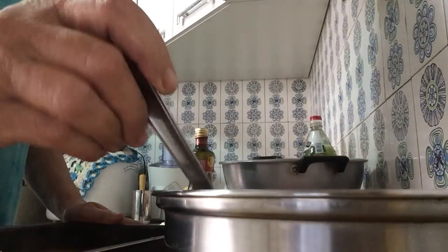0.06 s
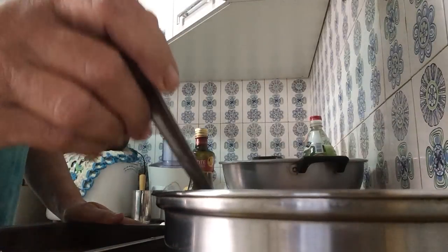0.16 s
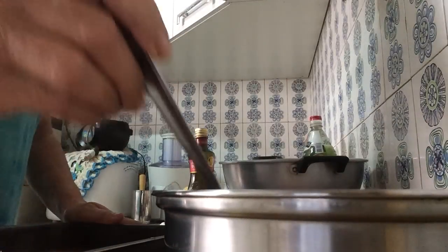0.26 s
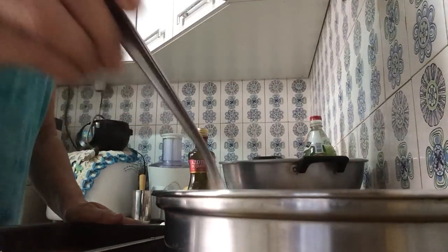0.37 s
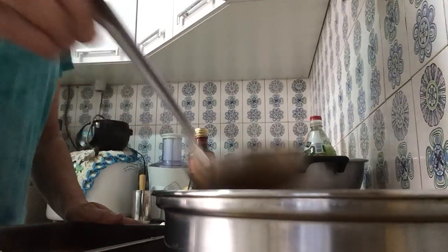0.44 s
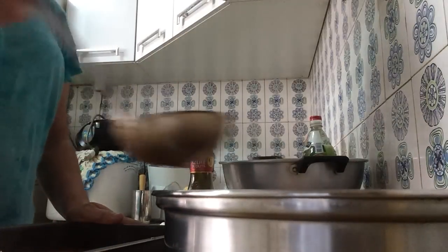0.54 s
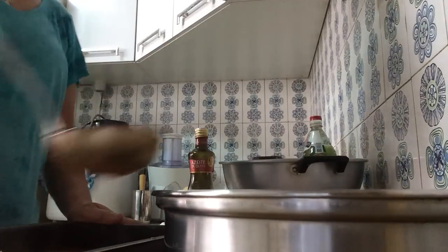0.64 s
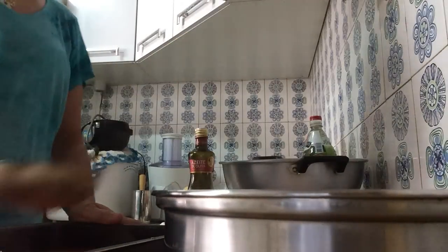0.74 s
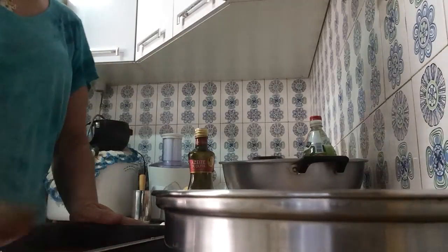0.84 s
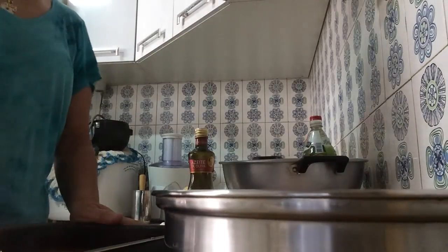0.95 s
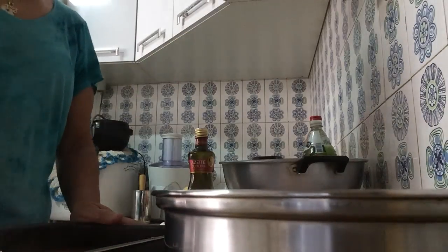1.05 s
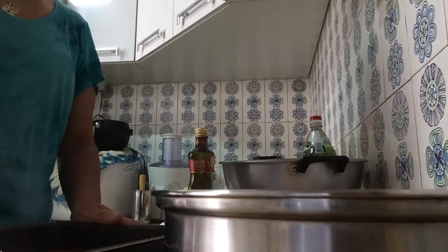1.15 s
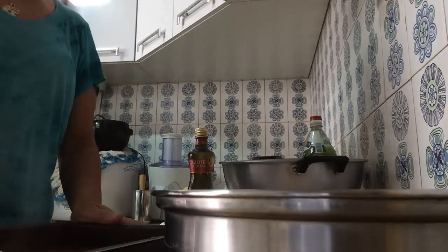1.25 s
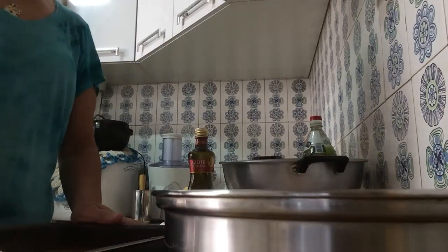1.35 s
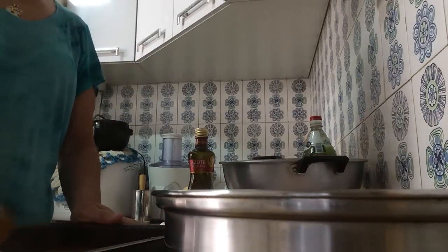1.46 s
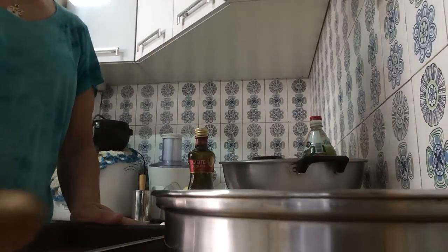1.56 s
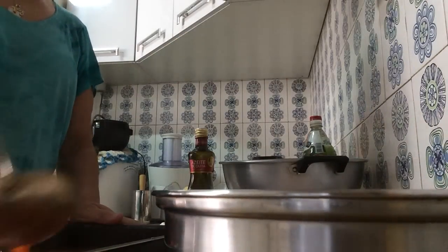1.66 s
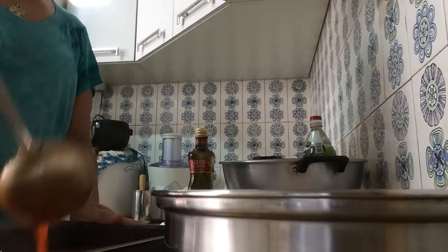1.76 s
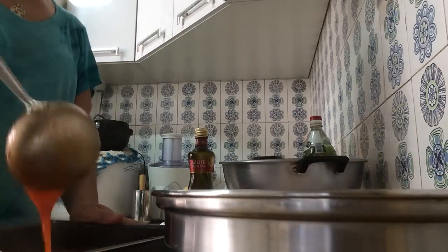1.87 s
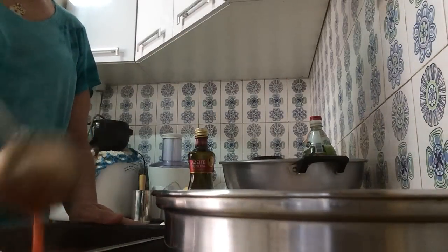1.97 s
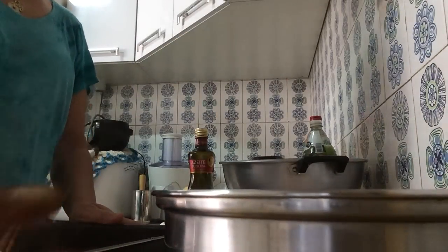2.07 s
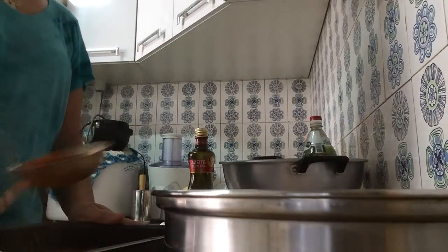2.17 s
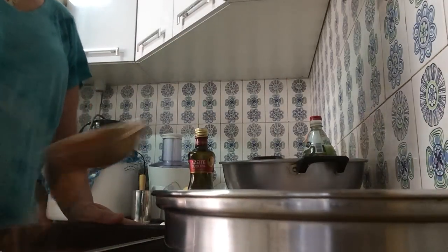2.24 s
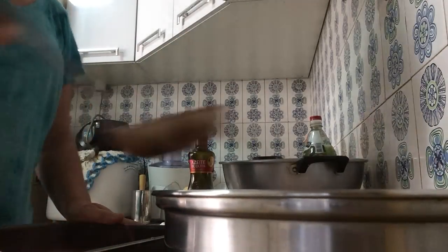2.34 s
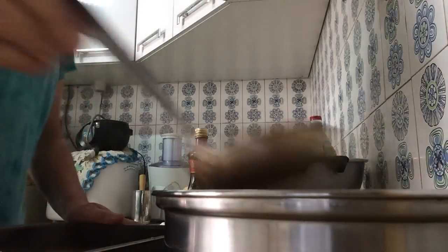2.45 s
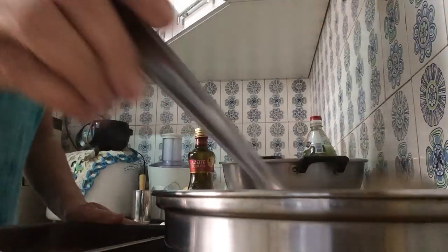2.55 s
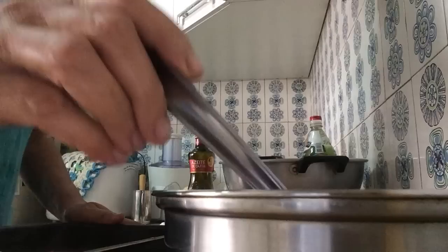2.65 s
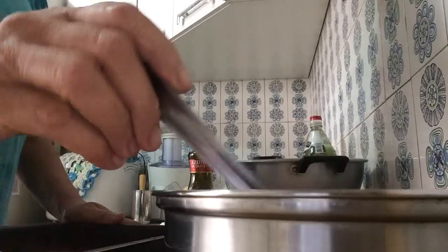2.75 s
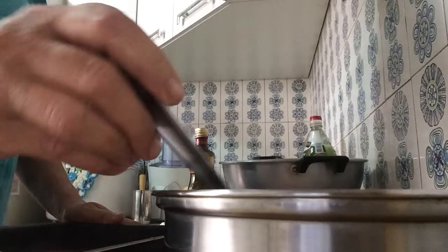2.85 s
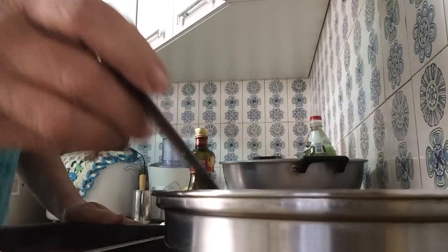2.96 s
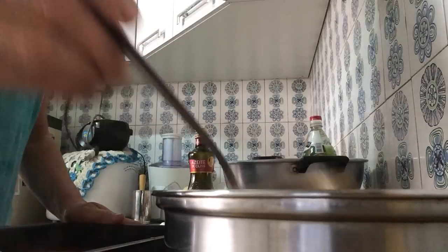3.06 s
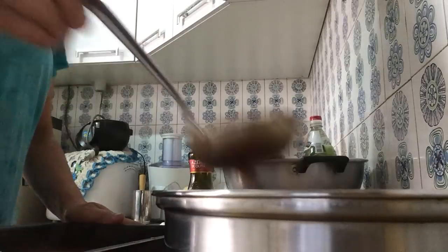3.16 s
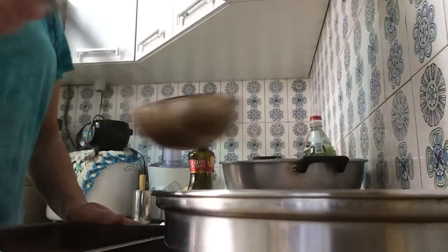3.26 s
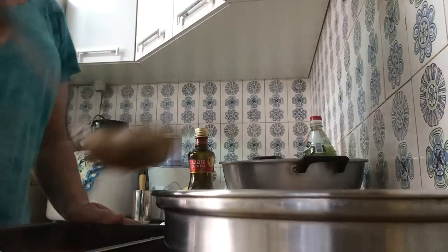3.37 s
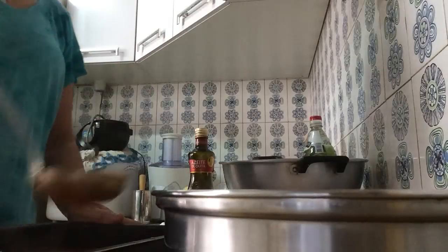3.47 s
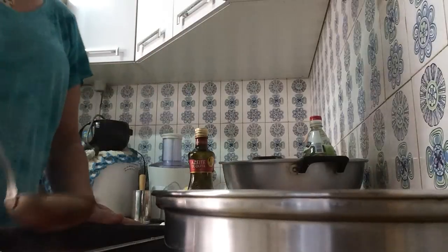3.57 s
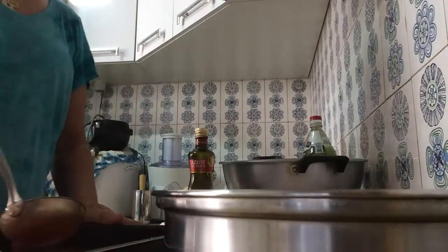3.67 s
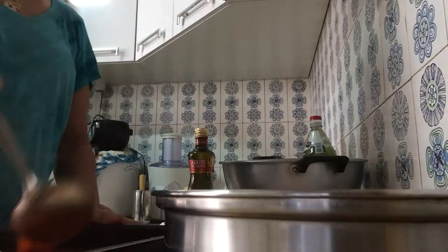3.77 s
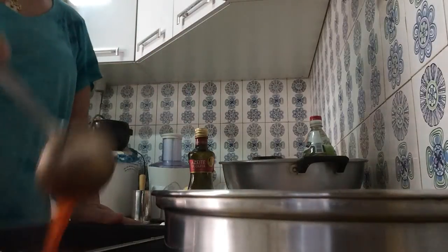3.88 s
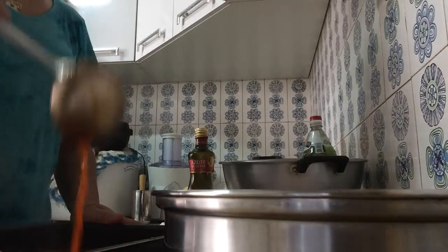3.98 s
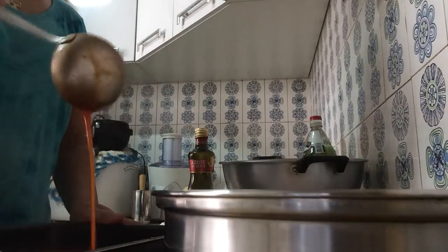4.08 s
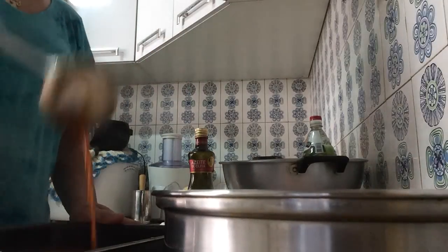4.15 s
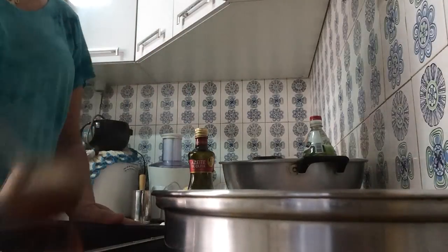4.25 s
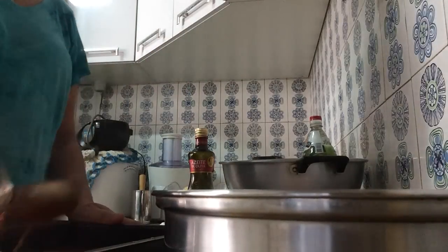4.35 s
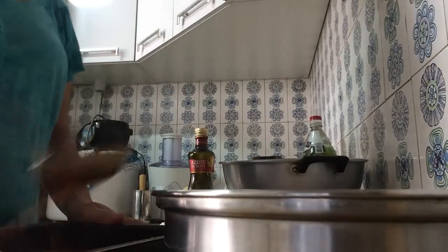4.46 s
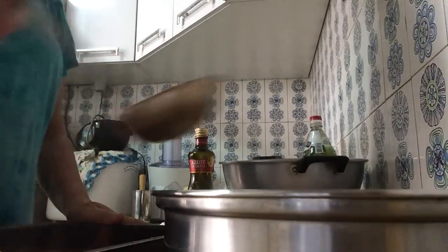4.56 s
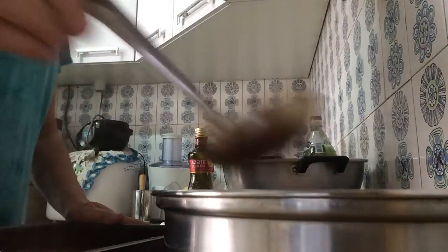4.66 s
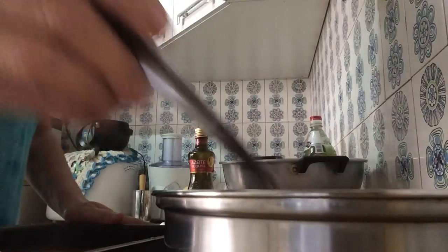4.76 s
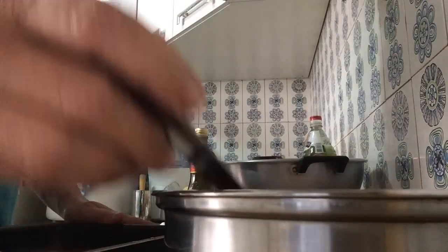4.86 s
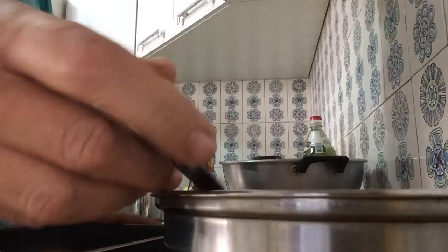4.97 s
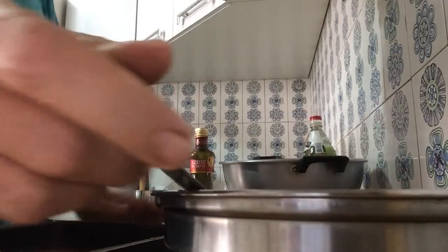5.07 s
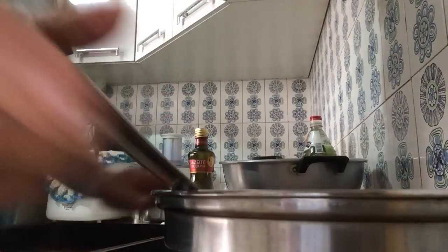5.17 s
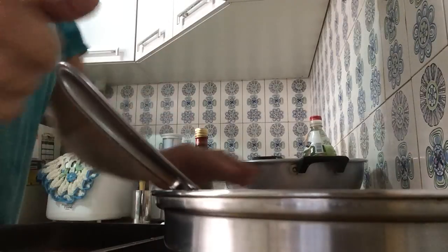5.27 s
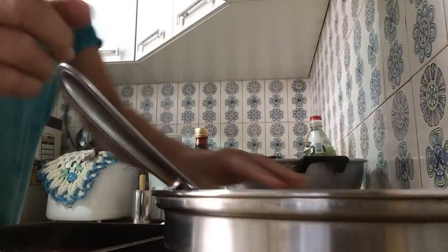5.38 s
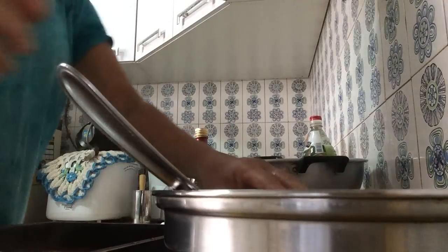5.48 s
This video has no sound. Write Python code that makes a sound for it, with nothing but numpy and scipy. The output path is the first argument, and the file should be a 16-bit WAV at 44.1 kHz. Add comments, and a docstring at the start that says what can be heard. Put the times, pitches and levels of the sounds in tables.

```python
"""A light scrape and a few soft knocks come first: a steel ladle in a wide pot of sauce, close by.
A loud clank follows, and later a bouncing clatter, each trailing a scrape. Blows and slips ring
the pot's modes, the sauce damps them short, and the pot thuds dully under the hits. Faint ticks,
muffled bumps and a thin ring near 3 kHz come between, over appliance hum in a small tiled kitchen."""
import sys
import numpy as np
from scipy import signal
from scipy.fft import rfft, irfft, next_fast_len
from scipy.io import wavfile
from scipy.ndimage import uniform_filter1d

SR = 44100
rng = np.random.default_rng(int(sys.argv[2]) if len(sys.argv) > 2 else 0)


def transcribe(signal):
    """Save signal, clipped to [-1, 1], as a 16-bit WAV file at the path in sys.argv[1]."""
    frames = np.atleast_2d(signal).T
    limited = np.clip(frames, -1, 1)
    pcm = np.round(limited * 32767).astype(np.int16)
    wavfile.write(sys.argv[1], SR, pcm)


N = 243387
TOP_HZ = 15400


def undb(db):
    return 10 ** (np.asarray(db) / 20)


def unit_rms(x):
    return x / np.sqrt(np.mean(x ** 2))


def decay(t, t60):
    return np.exp(-np.log(1000) * t / t60)


def between(ends, share):
    return ends[0] + (ends[1] - ends[0]) * np.clip(share, 0, 1)


def mix_in(out, start_s, sound):
    i = int(start_s * SR)
    out[i:i + len(sound)] += sound[:N - i]


def shaped_noise(curve, peaks=()):
    """Noise of rms 1, EQ'd by a (frequency [Hz], level [dB]) curve and optional narrow peaks."""
    size = next_fast_len(N)
    hz = np.maximum(np.arange(size // 2 + 1) * SR / size, 1)
    curve_hz, curve_db = np.transpose(curve)
    db = np.interp(np.log(hz), np.log(curve_hz), curve_db)
    for centre_hz, width_hz, boost_db in peaks:
        db = db + boost_db / (1 + (2 * (hz - centre_hz) / width_hz) ** 2)
    return unit_rms(irfft(rfft(rng.standard_normal(size)) * undb(db), size)[:N])


def wander(rate_hz):
    """Slewed random sample-and-hold, rms 1."""
    hold = int(SR / rate_hz)
    steps = np.repeat(rng.standard_normal(N // hold + 1), hold)
    return unit_rms(uniform_filter1d(steps, hold)[:N])


# Room tone EQ: (frequency [Hz], relative level [dB])
ROOM_TONE = [(15, -65), (25, -36.5), (43, -13.5), (68, -10.5), (91, -15.5), (156, -1), (193, -16),
             (313, -12.5), (523, -24), (1710, -28.5), (2170, -32), (2360, -35), (2700, -40), (13500, -50.5),
             (15500, -53)]
# Hum bands standing out of the room tone: (centre [Hz], width [Hz], boost [dB])
HUM_BANDS = [(59.1, 14, 8), (165, 27, 4.5), (216.3, 59, 9.5), (329.7, 36, 8), (410.2, 38, 14),
             (580, 120, 6.5), (1658, 15, 10.5), (2300, 39, 11.5), (4860, 60, 12), (6550, 60, 10.5),
             (7630, 170, 9), (13100, 200, 7)]


def appliance_hum(level_db=-53.5, drift_db=0.95):
    """Appliances lay down a low, gently drifting noise bed with narrow humming bands."""
    return undb(level_db + drift_db * wander(4.4)) * shaped_noise(ROOM_TONE, HUM_BANDS)


# Swells of the thin ring: (time [s], level [dB], length [s])
RING_SWELLS = [(0.163, -68, 0.034), (0.437, -83, 0.16), (0.585, -80.5, 0.04), (2.57, -81, 0.11),
               (3.24, -80, 0.061), (4.77, -79.5, 0.055), (5.135, -60, 0.059)]


def thin_ring(pitch_hz=3019, width_hz=35, rest_db=-90.5):
    """A faint, thin ring at one of the pot's pitches: a narrow noise band that swells now and then."""
    t = np.arange(N) / SR
    swells = sum(undb(db) * np.exp(-.5 * (2 * (t - time) / length) ** 2)
                 for time, db, length in RING_SWELLS)
    band = [(pitch_hz + k * width_hz, db) for k, db in ((-4, -50), (-1, -8), (0, 0), (1, -8), (4, -50))]
    return (undb(rest_db) + swells) * shaped_noise(band)


# Pot thuds and soft bumps: (time [s], level [dB], cutoff [Hz], attack [s], roll-off [dB/octave])
THUDS = [(0.031, -59, 797, 0.011, 15), (.255, -45.5, 665, 0.0017, 25), (0.902, -41.5, 345, 0.08, 26),
         (1.36, -48.5, 616, 0.03, 13.5), (1.471, -64.5, 915, 0.0089, 9), (2.187, -46.5, 556, 0.028, 11.5),
         (2.313, -44, 356, .025, 29), (2.679, -51.5, 350.3, .03, 24.5), (2.757, -44.5, 697, 0.0032, 14.5),
         (3.413, -60.5, 421, 0.022, 11.5), (4.699, -55, 376.5, .02, 27), (5.1, -45, 610, .01, 40),
         (5.223, -43.5, 590, 0.013, 15)]


def thuds(t60=0.37):
    """Dull low thuds of the pot under the ladle's hits, with soft muffled bumps between them."""
    out, t = np.zeros(N), np.arange(SR // 2) / SR
    for time, db, cutoff_hz, attack, rolloff in THUDS:
        curve = [(150, -30), (300, 0), (cutoff_hz, -3), (16 * cutoff_hz, -3 - 4 * rolloff)]
        body = shaped_noise(curve)[:len(t)]
        mix_in(out, time, undb(db) * body * np.minimum(t / attack, 1) * decay(t, t60))
    return out


# Faint ticks: (time [s], level [dB], centre [Hz], filter width [Hz])
FAINT_TICKS = [(.045, -47, 7360, 1200), (0.104, -41, 7000, 1200), (.1245, -45.5, 5600, 2500),
               (0.295, -49, 9300, 7000), (1.72, -71, 5000, 4000), (2.2788, -50, 5900, 1790),
               (2.316, -57.5, 3750, 3000), (2.924, -46, 4100, 350), (4.354, -56, 1300, 800),
               (4.492, -51, 6800, 1965), (4.515, -58, 1300, 700), (4.9248, -61.5, 12170, 7000),
               (4.986, -63, 9900, 8000)]


def ticks(t60=.036, sheen_db=-18.5):
    """Small steel clicks: a burst of band-passed noise with a broad sheen up to an octave above."""
    out, t = np.zeros(N), np.arange(SR // 8) / SR
    for time, level_db, centre_hz, width_hz in FAINT_TICKS:
        sheen_hz = min(2 * centre_hz, TOP_HZ)
        for db, hz, width in ((level_db, centre_hz, width_hz), (level_db + sheen_db, sheen_hz, sheen_hz)):
            radius = np.exp(-np.pi * width / SR)
            poles = [1, -2 * radius * np.cos(2 * np.pi * hz / SR), radius ** 2]
            band = signal.lfilter([1, 0, -1], poles, rng.standard_normal(len(t)))
            band = signal.lfilter([1], poles, band)  # steeper skirts
            mix_in(out, time, undb(db) * unit_rms(band) * decay(t, t60))
    return out


# Modes of pot and ladle: (frequency [Hz], level on a floor hit [dB], level on a rim hit [dB], t60 [s])
POT_MODES = [(580, -7.5, -18.5, 0.14), (762.8, -9, -27.5, 0.056), (985, -3, -21.5, .09),
             (1204.4, 0, -1, .085), (1239, -5.5, -5.5, 0.15), (1336, -15.5, 2, .085), (1392, -9, -9, 0.087),
             (1621, -9.5, -16, 0.14), (1730, -6.5, -9, 0.14), (1790, 0.5, -12.5, .08),
             (483, -18.5, -17, 0.13), (1843, -5.5, -21, 0.06), (2299, -3, -21.5, 0.059),
             (2466, -9, -6, .17), (2373, -6, -19.5, .09), (2828, -9.5, -9.5, 0.17),
             (2850, -17, -13.5, 0.13), (3015, -19, -22.5, .18), (3325, -4, -21, .11),
             (3170, -12, -19.5, 0.11), (4183, -23, -21.5, 0.11), (4442, -20.5, -24.5, .12),
             (5170, -22.5, -15.5, 0.11), (5774, -18.5, -15.5, 0.093), (5997, -12, -19.5, 0.0794),
             (6350, -14.5, -17.5, 0.16), (6980, -19, -18.5, 0.14), (7700, -24.5, -13.5, .1),
             (8920, -21, -17, 0.088), (11930, -23, -20, 0.06)]


def pot_ring(t, centre_hz, spread_oct, rim, t60_scale):
    """One push rings the pot: the spot sets the mode balance, the contact favours one pitch region."""
    hz, floor_db, rim_db, t60 = np.transpose(POT_MODES)[:, :, None]
    focus = np.exp(-.5 * (np.log2(hz / centre_hz) / spread_oct) ** 2)
    gain = undb(between((floor_db, rim_db), rim)) * focus
    polarity = (-1.) ** np.arange(len(POT_MODES))[:, None]
    return np.sum(polarity * gain * decay(t, t60 * t60_scale) * np.sin(2 * np.pi * hz * t), axis=0)


def treble_peaks(width_hz, boost_db):
    """EQ peaks on the pot's upper modes, to make noise sound like its steel."""
    return [(hz, width_hz, boost_db) for hz, *_ in POT_MODES if hz > 3500]


# Friction hiss EQ: (frequency [Hz], relative level [dB])
HISS_EQ = [(2060, -44), (3500, -12.5), (4460, -8), (4810, -8), (6250, -2.5), (8060, -3.5), (8800, -2),
           (9840, -4), (12300, -6.5), (15500, -19.5)]
# Ladle slides: (start [s], end [s], low ring [dB], high ring [dB], hiss [dB],
# ring fade [dB/s], hiss fade [dB/s]); a negative fade swells
LADLE_SLIDES = [(0, 0.132, -49, -56, -53, 85, -18), (2.775, 2.936, -44, -47.5, -46, 60, 15),
                (3.756, 3.792, -76, -74.5, -79, 30.5, 39.5), (4.969, 5.09, -64, -75, -80, 30, 6),
                (5.098, 5.124, -53.5, -63, -70, -5, -49.5), (5.145, 5.233, -58, -62, -75, 19, -42),
                (5.235, 5.308, -40, -36.5, -38.5, 86, 45)]


def ladle_scrapes(catch_db=1.5, flicker_db=2.5, rasp_db=-6, release_db_per_s=700):
    """Dense, uneven slips of steel on steel drive the low and high modes, with rasp and gritty hiss."""
    out, t = np.zeros(N), np.arange(N) / SR
    slips = rng.standard_normal((2, N))
    low_ring = pot_ring(t[:SR // 8], centre_hz=1100, spread_oct=.7, rim=.075, t60_scale=.16)
    high_ring = pot_ring(t[:SR // 8], centre_hz=2800, spread_oct=.4, rim=.3, t60_scale=.4)
    low_rasp = shaped_noise([(300, -39.5), (600, -10), (1400, 4), (2200, -10.5), (4000, -41)])
    high_rasp = shaped_noise([(1200, -37.5), (2100, -2.5), (3400, -2.5), (4500, -19), (8000, -50)])
    low = unit_rms(signal.fftconvolve(slips[0], low_ring)[:N]) + undb(rasp_db) * low_rasp
    high = unit_rms(signal.fftconvolve(slips[1], high_ring)[:N]) + undb(rasp_db) * high_rasp
    hiss = shaped_noise(HISS_EQ, treble_peaks(width_hz=200, boost_db=6))
    catch = catch_db * wander(220)  # the slips shake all layers together
    layers = [layer * undb(catch + flicker_db * wander(70)) for layer in (low, high, hiss)]
    for start, end, *levels, ring_fade, hiss_fade in LADLE_SLIDES:
        attack = uniform_filter1d(1. * (t >= start), size=400, mode="nearest")
        release = undb(-release_db_per_s * np.maximum(t - end, 0))  # the ladle lifts
        sliding_s = np.clip(t, start, end) - start
        for layer, db, fade in zip(layers, levels, (ring_fade, ring_fade, hiss_fade)):
            out += attack * release * undb(db - fade * sliding_s) * layer
    return out


# Impact crack EQ: (frequency [Hz], relative level [dB])
CRACK_EQ = [(240, -52), (400, -19.5), (715, -23), (1280, -4), (1850, -8), (2060, -19.5), (2320, -14),
            (3360, -12.5), (4700, -22.5), (5910, -15.5), (8280, -22.5), (11800, -24), (15500, -33)]
# Ladle hits: (time [s], ring [dB], ring centre [Hz], spot [0 floor, 1 rim], crack [dB], hardness [0-1])
LADLE_HITS = [(0.032, -48, 994, .1, -73, 0.2), (0.132, -55, 1800, 0.093, -48.5, 0.8),
              (0.2532, -43, 1600, 0.32, -34, 0.83), (0.2585, -29.5, 1550, 0.12, -55, 0.01),
              (0.299, -48.5, 3060, 0.3, -52, 1), (2.7569, -13.5, 1950, 0.07, -15, .78),
              (2.7619, -20, 1610, 0.061, -29, 0.16), (2.7718, -33, 1784, 0.044, -24, 0.38),
              (4.987, -59.5, 1170, 0.33, -54.5, 0.32), (5.084, -52, 1270, 0.48, -62, 0.45),
              (5.099, -26, 1620, 0.45, -51, 0.01), (5.118, -29, 1660, 0.46, -55, 0.02),
              (5.136, -39, 1700, 0.32, -57, 0), (5.182, -35, 1430, 0.38, -64, 0.04),
              (5.2201, -15.5, 1320, 1, -22.5, .82), (5.238, -15.5, 1780, 1, -28.5, 0.83),
              (5.2569, -42, 2830, 0.36, -31, 0.73), (5.274, -24, 1800, 0.83, -33, 0.73),
              (5.295, -30, 2500, 0.75, -44, 0.5), (5.308, -35, 2200, 1, -34, 0.22),
              (5.324, -35, 2200, 0.46, -38.5, 0.44)]


def ladle_knocks(attack_s=0.00077):
    """Each hit rings the pot's main modes; its many small, crowded modes add a noisy crack."""
    # (softest, hardest): a harder hit reaches more modes, rings longer and cracks brighter
    spread_oct, t60_scale, tilt_db_per_oct = (.18, 2.1), (.54, .85), (-4.5, 3.5)
    crack_t60 = (0.054, 0.11)  # (floor, rim)
    out, t = np.zeros(N), np.arange(SR // 3) / SR
    crowded_modes = shaped_noise(CRACK_EQ, treble_peaks(width_hz=120, boost_db=7))
    hz = np.arange(len(t) // 2 + 1) * SR / len(t)
    octaves = np.log2(np.maximum(hz, 300) / 2000)
    for time, ring_db, centre_hz, rim, crack_db, hardness in LADLE_HITS:
        burst = np.roll(crowded_modes, -int(time * SR))[:len(t)]
        tilt = undb(between(tilt_db_per_oct, hardness) * octaves)
        crack = irfft(rfft(burst) * tilt, len(t)) * decay(t, between(crack_t60, rim))
        ring = pot_ring(t, centre_hz, between(spread_oct, hardness), rim, between(t60_scale, hardness))
        mix_in(out, time, (undb(ring_db) * ring + undb(crack_db) * crack) * np.minimum(t / attack_s, 1))
    return out


def kitchen_reverb(x, t60=0.32, wet_db=-15.5, cutoff_hz=4960, attack_s=0.0024):
    """Tiled walls return a short, duller tail."""
    t = np.arange(SR // 2) / SR
    tail = rng.standard_normal(len(t)) * decay(t, t60) * np.minimum(t / attack_s, 1)
    tail = signal.lfilter(*signal.butter(1, cutoff_hz, fs=SR), tail)
    return signal.fftconvolve(x, undb(wet_db) * tail / np.sqrt(np.sum(tail ** 2)))[:N]


def scene():
    """Mono mix: the hum, the thin ring, and the close steel and thuds with their reverb."""
    low_cut = signal.butter(2, 350, "highpass", fs=SR, output="sos")  # small steel radiates little bass
    steel = signal.sosfilt(low_cut, ladle_knocks() + ladle_scrapes() + ticks())
    close = steel + thuds()
    return (appliance_hum() + thin_ring() + close + kitchen_reverb(close))[None, :]


def record(dry):
    """A phone ducks its bass while the upper range is loud, and cuts the top."""
    crossover_hz, depth_db, knee_db, window_s = 400, -4, -54.5, .05
    bass = signal.sosfiltfilt(signal.butter(2, crossover_hz, fs=SR, output="sos"), dry)
    upper = dry - bass
    sidechain = signal.lfilter([1, -1], [1, -.8], upper)  # leans toward the treble
    envelope = uniform_filter1d(np.abs(sidechain), int(window_s * SR))
    ducked = upper + bass * undb(depth_db * envelope / (envelope + undb(knee_db)))
    return signal.sosfilt(signal.ellip(10, .2, 60, TOP_HZ, fs=SR, output="sos"), ducked)


dry = scene()
out = record(dry)
transcribe(out)
```